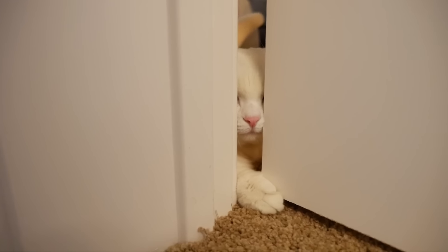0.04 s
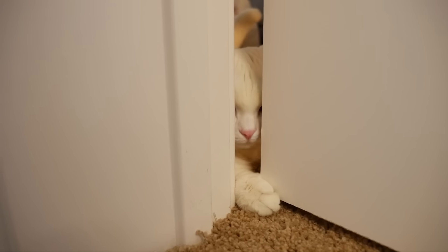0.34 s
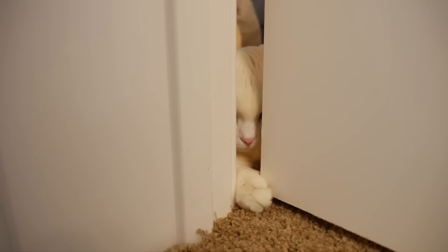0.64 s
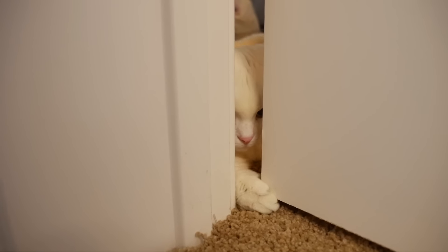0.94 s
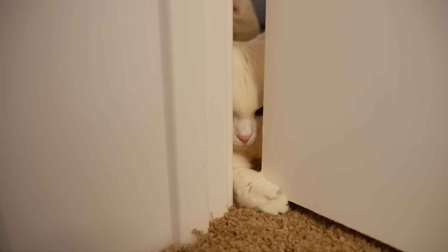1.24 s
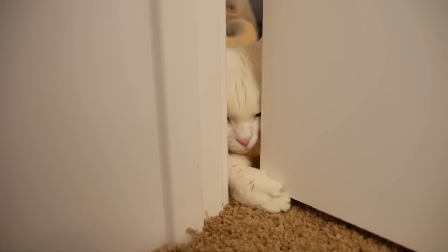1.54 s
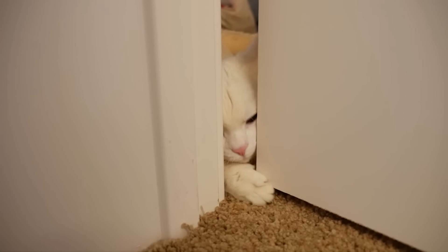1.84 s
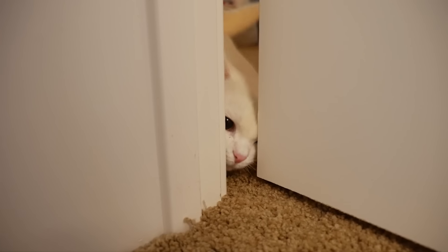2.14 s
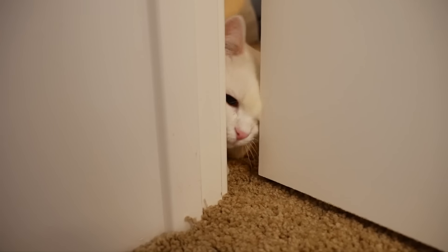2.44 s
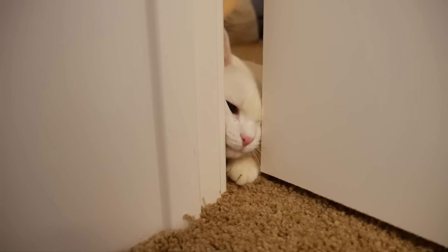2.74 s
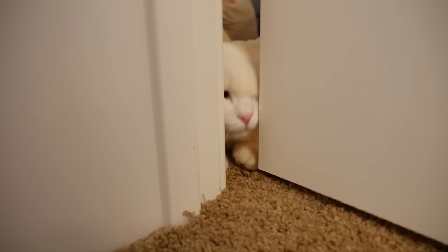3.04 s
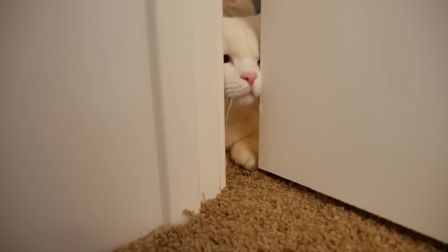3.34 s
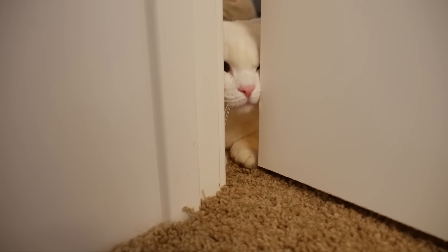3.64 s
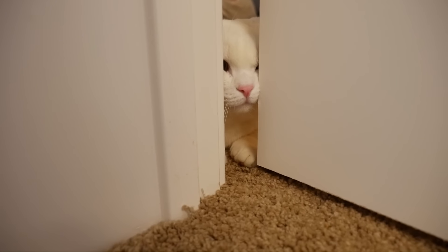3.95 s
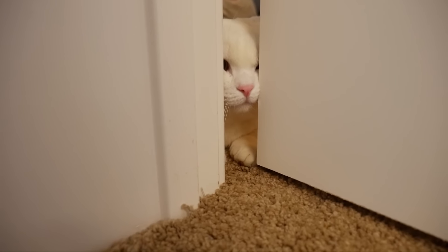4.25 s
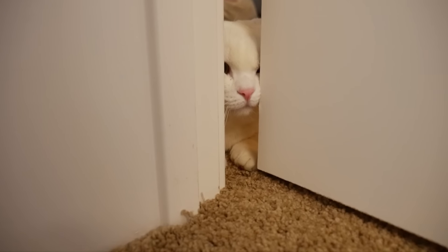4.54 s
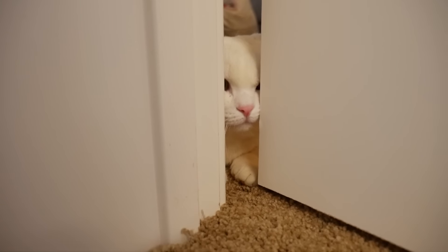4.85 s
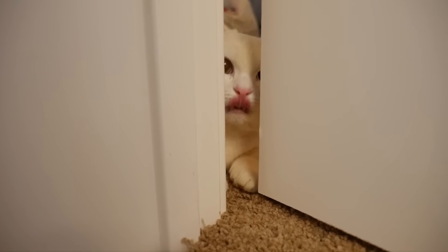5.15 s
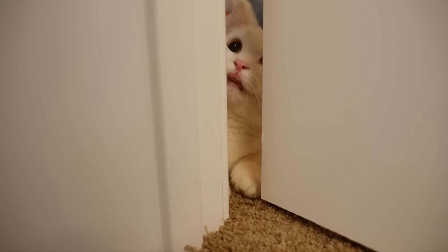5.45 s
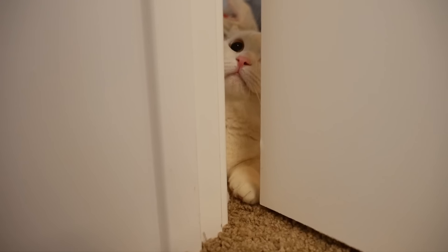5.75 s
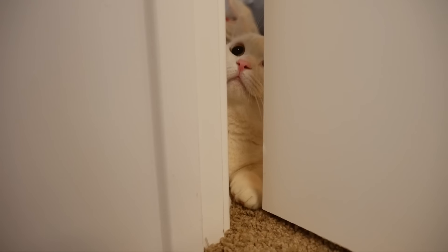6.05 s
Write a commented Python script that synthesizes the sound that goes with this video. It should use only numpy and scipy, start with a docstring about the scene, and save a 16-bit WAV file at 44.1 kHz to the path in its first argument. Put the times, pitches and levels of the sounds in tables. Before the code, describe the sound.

Uneven hollow thumps and metal clacks come from an indoor door as a kitten pushes at the gap, with faint fur brushing.

```python
"""A small, live hallway, close to a hollow wooden door: a kitten shoves and paws at the gap.
Each shove sets the panel booming in its low modes and knocks the wood against its frame. Loose metal
fittings clack, the hinge squeaks once, and the hallway prolongs each impact as reverberation.
Fur and claws brush the edge and the carpet with a frictional hiss; ventilation murmurs underneath."""
import sys
import numpy as np
from scipy import signal
from scipy.fft import rfft, irfft, next_fast_len
from scipy.io import wavfile
from scipy.ndimage import uniform_filter1d

SR = 44100
rng = np.random.default_rng(int(sys.argv[2]) if len(sys.argv) > 2 else 0)


def pcm_store(signal):
    """Save signal as 16-bit PCM."""
    levels = np.round(np.clip(np.atleast_2d(signal), -1, 1) * 32767)
    wavfile.write(sys.argv[1], SR, levels.astype(np.int16).T)


N = 269495
T = np.arange(SR) / SR  # the life of one impact, in seconds
LEAD_S = 0.02  # time an impact has to scrape in before it lands

# Blows on the door. Each row: start in seconds, boom level in dB, boom tilt in dB per octave,
# knock level in dB, pitch of the struck spot in Hz, build-up in seconds.
BLOWS = [(0.0, -19.5, -3.5, -26, 523, 0.0044), (0.417, -44, 17, -35, 590, 0.024),
         (0.775, -41.5, 13, -45.5, 275, 0.0099), (0.841, -39, 9.5, -52, 246, .007),
         (1.022, -32, -4, -42.5, 300, 0.021), (1.1, -37.5, 5, -38.5, 580, 0.0043),
         (1.163, -48, -4, -23, 963, 0.016), (1.188, -18.5, -2.5, -25, 178, 0.013),
         (1.39, -35.5, -1, -37, 554, .005), (1.436, -30, 1.5, -35.5, 287, 0.015),
         (1.52, -33, -6, -27.5, 1022, 0.011), (1.584, -39, 8, -41, 584, 0.0067),
         (1.768, -62, 6, -47.5, 593, 0.0011), (1.865, -71, -12, -42.5, 600, 0.0092),
         (2.247, -55, -5, -38.5, 923, 0.0091), (2.477, -46, 17, -23.5, 903, 0.0033),
         (2.496, -23, -1.5, -21, 528, 0.0027), (2.888, -45.5, -2, -30.5, 1520, 0.019),
         (3.085, -27.5, 17, -24, 342.6, 0.0085), (3.138, -25, 5, -28.5, 263, 0.037),
         (3.391, -41.5, 5, -35.5, 1333, 0.013), (4.832, -22.5, 0, -23, 178.6, 0.016),
         (4.925, -23.5, 4, -28.5, 262, 0.029), (5.221, -59, -3, -41.5, 707, 0.019),
         (5.342, -42.5, 19, -34, 1610, 0.0056), (5.36, -43, 18, -30.5, 509, 0.0016),
         (5.373, -62, 8, -30, 840, 0.011), (5.748, -47.5, 5, -52, 500, 0.014)]
# Modes of the hollow panel. Each row: frequency in Hz, relative level in dB, 60 dB decay time in seconds.
PANEL_MODES = [(83.3, -15, 0.32), (99.2, -18, 0.84), (120.7, 2.5, 0.53), (156, 1.5, 0.46),
               (183.9, -3.5, 0.48), (195.4, -7, 0.94), (228.2, -12, 0.88), (259, -5, 0.55),
               (285.9, -6, 0.37), (344.4, -21, 0.98)]
# Spectrum of a wooden knock. Each row: frequency in Hz, relative level in dB.
WOOD_SPECTRUM = [(30, -56), (65, -33), (105, -0.5), (250, 3.5), (400, 1), (600, 5), (1000, 0.5),
                 (1600, -6.5), (2800, -11), (6000, -23.5), (15000, -34)]
# Resonances of the door's edge. Each row: centre in Hz, width in Hz, height in dB.
EDGE_RESONANCES = [(401, 97, -2.5), (520.4, 22, 6.5), (581, 15, 4), (754, 74, -2.5), (1133, 30, 4),
                   (1532, 176, 7.5)]
# Low spots in the hollow middle ring out more than high ones at the stiff edge.
# Each row: pitch of the spot in Hz, emphasis in dB.
SPOT_EMPHASIS = [(260, 20.5), (560, 5.5), (1500, 10)]
# Clacks of fittings and claws. Each row: start in seconds, level in dB, tilt in dB per octave,
# relative level of the first contact in dB, ring frequency in Hz.
CLACKS = [(0.0, -40, -1, 9, 3640), (0.42, -31, 0, -1.5, 5960), (0.632, -48, -4.5, -8, 3980),
          (1.101, -55, -9, -6, 1800), (1.163, -44.5, 9, -10, 1200), (1.179, -30.5, 0, -5, 1650),
          (1.435, -43.5, 0.5, -7, 2200), (1.521, -28, 5.5, -6, 13700), (1.581, -37.5, 9, -10, 12800),
          (1.845, -47.5, 1, -16, 8500), (1.889, -55, 4, 7, 5070), (2.245, -37.5, 1, -1, 10700),
          (2.249, -35, -4, 5, 2900), (2.477, -28.5, .5, -6, 1500), (2.888, -29.5, -1, -7, 3030),
          (3.052, -46, -1.5, -1, 5300), (3.085, -25.5, 4, 5.5, 5240), (3.141, -34.5, 3.5, 6, 5240),
          (3.294, -55, 9, 4, 9800), (3.394, -43.5, 2.5, -5, 1390), (3.415, -43, 1, 4, 3930),
          (4.002, -51, -4.5, 4, 3100), (4.832, -28.5, -1, -18, 1520), (4.911, -37.5, 2, 5, 2200),
          (4.926, -42.5, -0.5, 11, 3750), (5.116, -43.5, -4.5, -9, 2930), (5.216, -41.5, -2, -5, 3280),
          (5.341, -26.5, 0.5, -22, 2460), (5.344, -30.5, 1.5, 8.5, 5100), (5.744, -58.5, 1, 6, 8800)]
# Spectrum of a clack. Each row: frequency in Hz, relative level in dB.
CLACK_SPECTRUM = [(30, -90), (200, -27), (800, 2), (1800, 6.5), (3000, 4.5), (4200, 2), (7500, -4),
                  (10300, 3), (12500, -4), (15000, -13.5), (16000, -18)]
# Resonances of the fittings. Each row: centre in Hz, width in Hz, height in dB.
METAL_RESONANCES = [(1956, 76, 5), (2230, 410, 3), (2914, 91, 5.5), (4480, 110, -4), (5600, 470, 0),
                    (7000, 910, 3.5), (11100, 220, 0.5)]
# Course of the hinge's squeak. Each row: time in seconds, pitch in Hz, level in dB.
SQUEAK = [(2.125, 3750, -87), (2.148, 3960, -65), (2.18, 4170, -67), (2.21, 4080, -69), (2.24, 4000, -68),
          (2.27, 3920, -80)]
# Strokes of fur and paw. Each row: middle in seconds, length in seconds, level in dB.
STROKES = [(0.312, 0.16, -55.5), (1.006, 0.049, -50.5), (1.885, 0.088, -54), (2.098, 0.2, -61),
           (3.731, 0.046, -52), (4.35, 0.2, -62), (5.356, .2, -51), (6.022, 0.077, -55.5)]
# Spectrum of brushing fur. Each row: frequency in Hz, relative level in dB.
FUR_SPECTRUM = [(300, 4.5), (1000, 11), (3000, 3.5), (5500, -1), (7800, -3.5), (10200, 0), (13000, -7),
                (16000, -16)]
# Spectrum of the ventilation. Each row: frequency in Hz, relative level in dB.
AIR_SPECTRUM = [(15, -83), (25, -50), (49, -37.5), (86, -14), (160, -3.5), (188, -6), (227, -7), (421, -14),
                (648, -16), (1020, -23), (1490, -26.5), (2630, -44), (2850, -58), (4870, -64),
                (15500, -79.5)]
# Reverberation of the hallway. Each row: frequency in Hz, 60 dB decay time in seconds.
HALL_T60 = [(100, 1), (260, 0.54), (700, 0.56), (1800, 0.53), (4800, 0.52), (10000, 0.42), (15000, 0.22)]
# Likeness of the two channels. Each row: frequency in Hz, left-right correlation.
CORRELATION = [(25, 0.3), (70, 0.99), (180, 1), (350, 0.96), (700, 0.79), (1400, 0.025), (2800, 0.18),
               (5500, 0.045), (10000, 0.41), (14000, 0.68)]
# Balance of the impacts. Each row: frequency in Hz, left minus right level in dB.
BALANCE = [(250, 0), (700, -1), (1400, -3), (2800, -2.5), (5500, -1.3), (10000, 0.5), (14000, .6)]


def door(relative_width=0.61, note_offset_db=-13, note_t60=0.21):
    """Impact excitation: each blow booms the panel, knocks the edge and rings the struck spot."""
    out = np.zeros((2, N))
    for start, boom_db, tilt, knock_db, spot_hz, rise in BLOWS:
        spot_db = along(SPOT_EMPHASIS, spot_hz)
        ripple = contact_ripple(depth_db=4.4, spacing_hz=60)
        peaks = EDGE_RESONANCES + [(spot_hz, relative_width * spot_hz, spot_db / 2)]
        colour = lambda hz: along(WOOD_SPECTRUM, hz) + resonances(peaks, hz) + ripple(hz)
        knock = hallway(colour, rise, early_db=7.5, early_s=0.0093, chatter_db=1.8)
        note = np.sin(2 * np.pi * spot_hz * T) * amp(-60 * T / note_t60) * (1 - np.exp(-T / rise))
        add(out, start - LEAD_S, amp(knock_db) * knock)
        add(out, start, amp(knock_db + spot_db + note_offset_db) * note)
        add(out, start, amp(boom_db) * panel_boom(tilt, rise))
    return out


def panel_boom(tilt, rise, detune=0.0079):
    """Superposition of damped low modes: each blow's tilt makes the panel's boom deeper or brighter."""
    hz, db, t60 = np.transpose(PANEL_MODES)[:, :, None]
    pitch_scatter, phase = rng.standard_normal((3, len(PANEL_MODES), 1))[1:]
    gain = amp(db + tilt * np.log2(hz / hz[0]))
    modes = np.sin(2 * np.pi * (hz * (1 + detune * pitch_scatter) * T + phase)) * amp(-60 * T / t60)
    attack = 1 - np.exp(-T / rise)
    return np.sqrt(2) * np.sum(gain * modes, axis=0) / np.linalg.norm(gain) * attack


def contact_ripple(depth_db, spacing_hz):
    """Modal coupling: each point of contact weights the dense upper modes anew, in dB over frequency."""
    knots = rng.standard_normal(600)
    return lambda hz: depth_db * np.interp(hz / spacing_hz, np.arange(len(knots)), knots) * hz / (hz + 600)


def fittings(contact_s=0.0012, pivot_hz=4500, ring_width_hz=450, ring_db=13, ring_in_tail=0.47):
    """Direct and reflected sound: loose metal snaps over with a ringing contact; the hallway answers."""
    out = np.zeros((2, N))
    age = T[:SR // 20] / contact_s
    for start, db, tilt, contact_db, ring_hz in CLACKS:
        rise = 0.0022 * 2 ** (-contact_db / 7)  # seconds; doubles for each 7 dB of weaker contact
        ripple = contact_ripple(depth_db=3.0, spacing_hz=110)
        body = lambda hz: (along(CLACK_SPECTRUM, hz) + resonances(METAL_RESONANCES, hz)
                           + ripple(hz) + tilt * np.log2((hz + 1) / pivot_hz))
        ring = lambda hz: resonances([(ring_hz, ring_width_hz, ring_db)], hz)
        snap = unit(filtered(rng.standard_normal(len(age)), lambda hz: amp(body(hz) + ring(hz))))
        tail_colour = lambda hz: body(hz) + ring_in_tail * ring(hz)
        answer = hallway(tail_colour, rise, early_db=4.0, early_s=0.015, chatter_db=3.4)
        add(out, start, amp(db + contact_db) * snap * age * np.exp(1 - age))
        add(out, start - LEAD_S, amp(db) * answer)
    return out


def hinge(waver=0.0049):
    """Frequency modulation: the hinge sings a faint, wavering tone as the door swings."""
    times, hz, db = np.transpose(SQUEAK)
    t = np.arange(N) / SR
    pitch = np.interp(t, times, hz) * (1 + waver * smooth_noise(N, 100))
    level = amp(np.interp(t, times, db)) * (t > times[0]) * (t < times[-1])
    return level * np.sin(2 * np.pi * np.cumsum(pitch) / SR)


def fur(fidget_db=-60.5, grain_db=1.14):
    """Stick-slip friction: fibres catch in tiny grains; strokes swell over the kitten's fidgeting."""
    t = np.arange(N) / SR
    swells = [amp(db) * np.exp(-2 * ((t - middle) / length) ** 2) for middle, length, db in STROKES]
    level = np.sqrt(amp(fidget_db) ** 2 + np.sum(np.square(swells), axis=0))  # powers add
    grains = amp(grain_db * smooth_noise(N, 90))
    return level * diffuse(grains * rng.standard_normal((2, N)), lambda hz: along(FUR_SPECTRUM, hz))


def ventilation(level_db=-54.0):
    """Stationary broadband noise: a low murmur with a little hiss."""
    return amp(level_db) * diffuse(rng.standard_normal((2, N)), lambda hz: along(AIR_SPECTRUM, hz))


def hallway(colour, rise, early_db, early_s, chatter_db, scrape_s=0.0012):
    """Reverberation: an impact landing at LEAD_S gives uneven early reflections, then a decaying tail."""
    age = T - LEAD_S
    hz, t, spectra = signal.stft(diffuse(rng.standard_normal((2, SR)), colour), SR, nperseg=256)
    decay = amp(-60 * np.maximum(t - LEAD_S, 0) / along(HALL_T60, hz)[:, None])
    tail = signal.istft(spectra * decay, SR, nperseg=256)[1][:, :SR]
    reflections_db = np.exp(-np.abs(age) / early_s) * (early_db + chatter_db * smooth_noise(SR, 60))
    build_up = .5 + .5 * np.tanh((age - 0.96 * rise) / (0.83 * rise + 2 * scrape_s))
    return tail * amp(reflections_db) * build_up


def diffuse(pair, colour):
    """Partial coherence: two noises form a coloured field of rms 1, near mono in the low mids."""
    angle = lambda hz: np.arccos(np.clip(along(CORRELATION, hz), -1, 1)) / 2
    response = lambda hz: amp(colour(hz)) * np.array([np.cos(angle(hz)), np.sin(angle(hz))])
    mid, side = filtered(pair, response)
    return unit(np.array([mid + side, mid - side]))


def resonances(peaks, hz):
    """Lorentzian curves: the dB that resonances add to a spectrum."""
    return sum(db / (1 + (2 * (hz - centre) / width) ** 2) for centre, width, db in peaks)


def smooth_noise(n, window):
    """A moving average of white noise, at rms 1."""
    return unit(uniform_filter1d(rng.standard_normal(n), size=window))


def filtered(x, response):
    """Linear filtering: x times a gain that depends on frequency."""
    n = x.shape[-1]
    padded = next_fast_len(n + SR // 10)
    return irfft(rfft(x, padded) * response(np.fft.rfftfreq(padded, 1 / SR)), padded)[..., :n]


def along(points, hz):
    """Interpolation of (Hz, value) points on a log axis."""
    knots_hz, values = np.transpose(points)
    return np.interp(np.log(hz + 1), np.log(knots_hz + 1), values)


def amp(db):
    """Decibels to gain."""
    return 10 ** (np.asarray(db) / 20)


def unit(x):
    """Normalisation to rms 1."""
    return x / np.sqrt(np.mean(x ** 2) + 1e-20)


def add(track, start_s, sound):
    """Superposition of a sound on the track."""
    start = round(start_s * SR)
    sound = sound[..., max(0, -start):]
    part = track[:, max(0, start):][:, :sound.shape[-1]]
    part += sound[..., :part.shape[-1]]


def scene():
    """The sources sum; a level difference places the impacts' midrange to the right."""
    balance = lambda hz: amp(np.outer([.5, -.5], along(BALANCE, hz)))
    return filtered(door() + fittings(), balance) + hinge() + fur() + ventilation()


def record(dry, notch_hz=7870, top_hz=15750):
    """Band limiting: the microphone has one narrow notch and a steep upper cutoff."""
    notched = filtered(dry, lambda hz: amp(resonances([(notch_hz, 90, -16)], hz)))
    return filtered(notched, lambda hz: 1 / (1 + (hz / top_hz) ** 160))


dry = scene()
out = record(dry)
pcm_store(out)
```